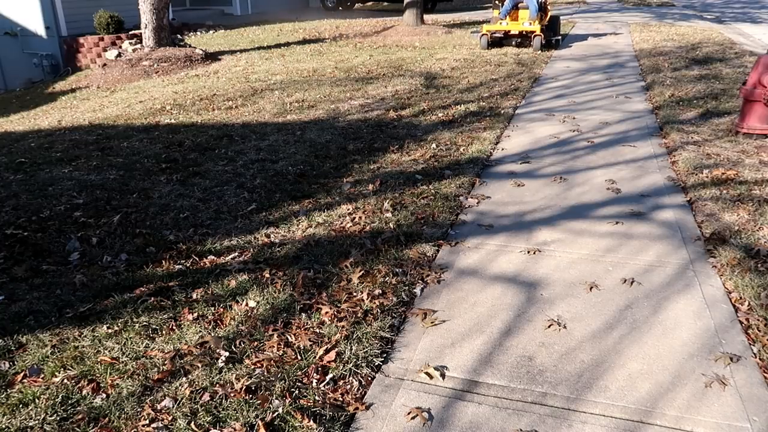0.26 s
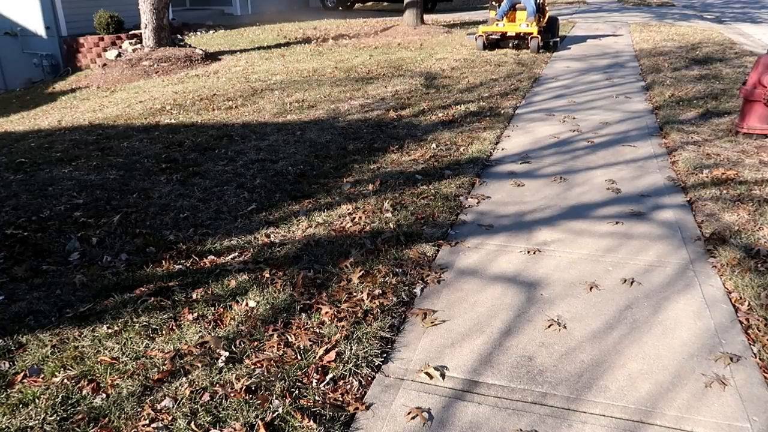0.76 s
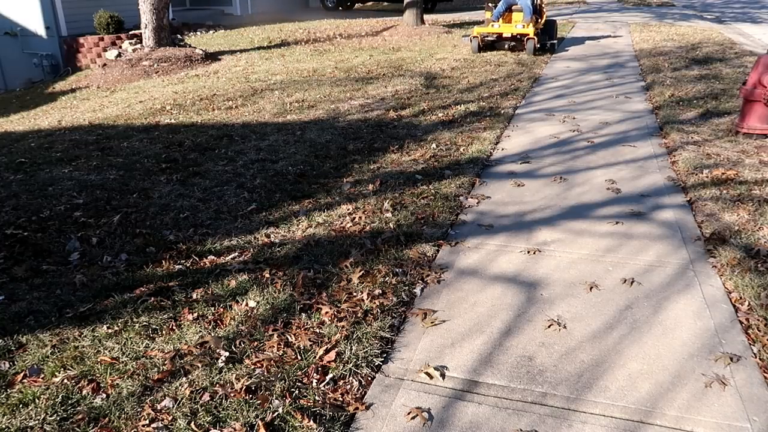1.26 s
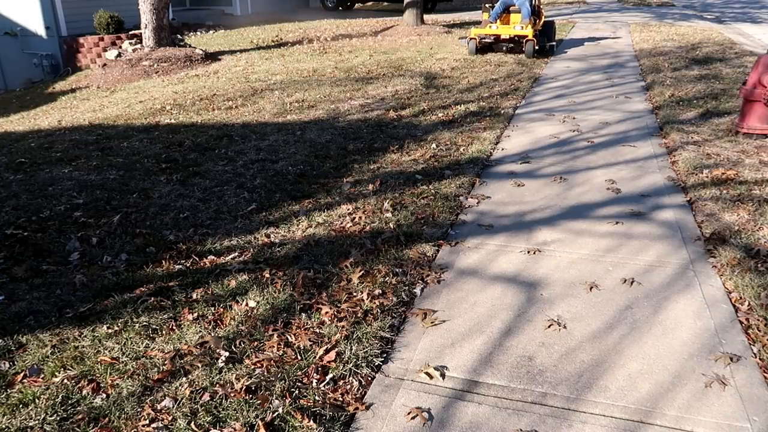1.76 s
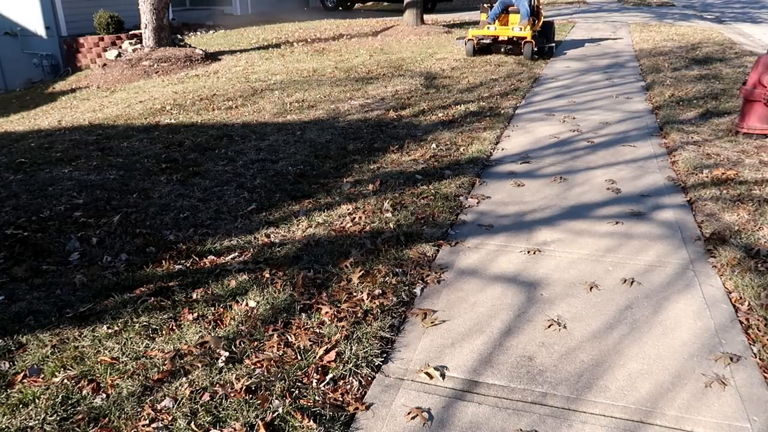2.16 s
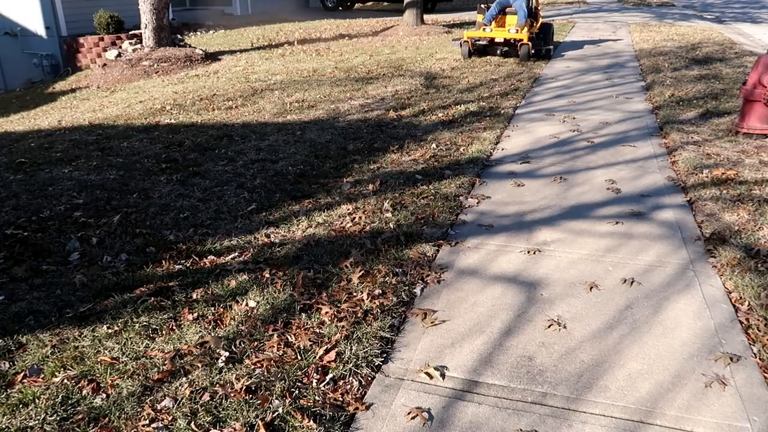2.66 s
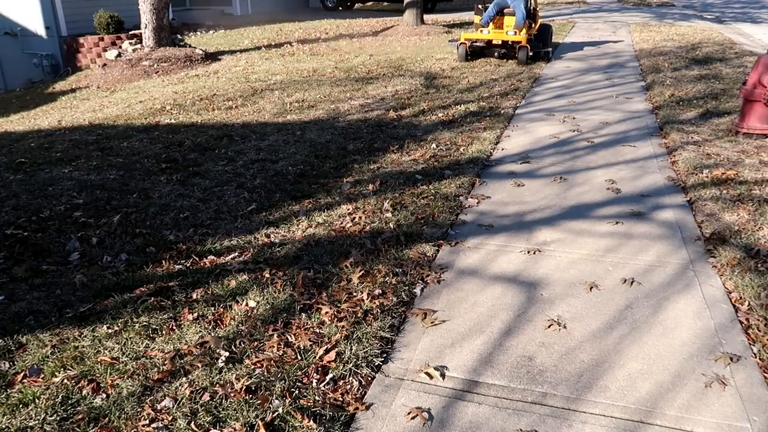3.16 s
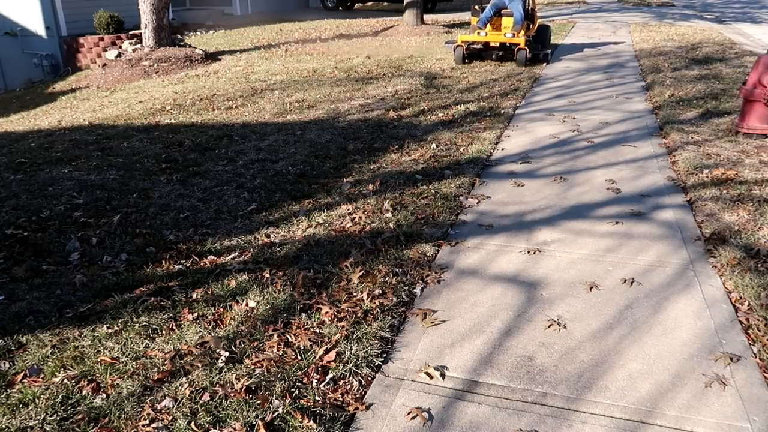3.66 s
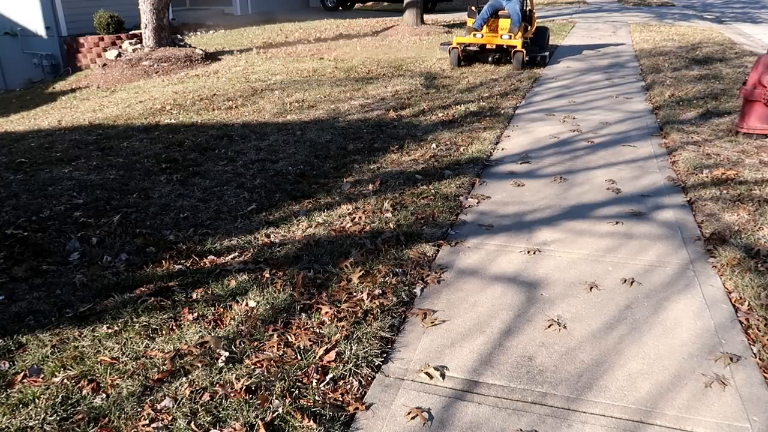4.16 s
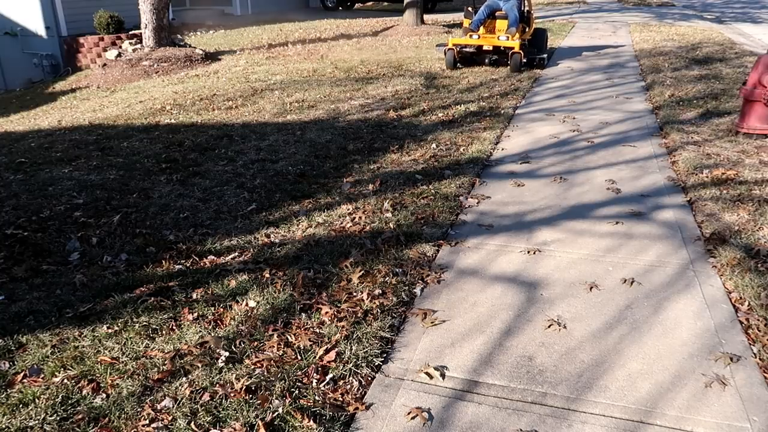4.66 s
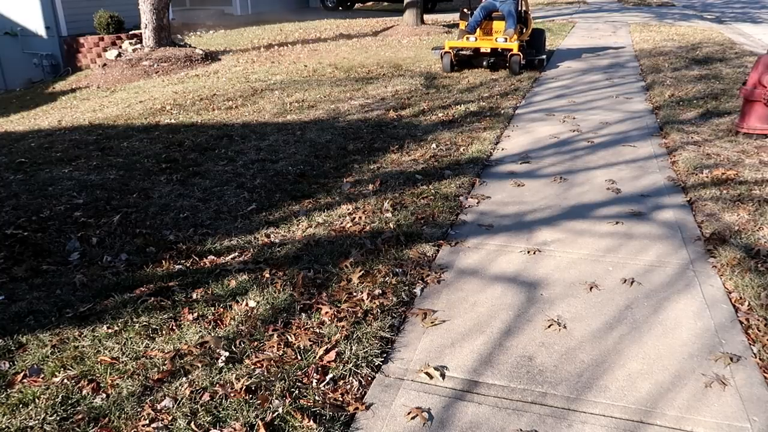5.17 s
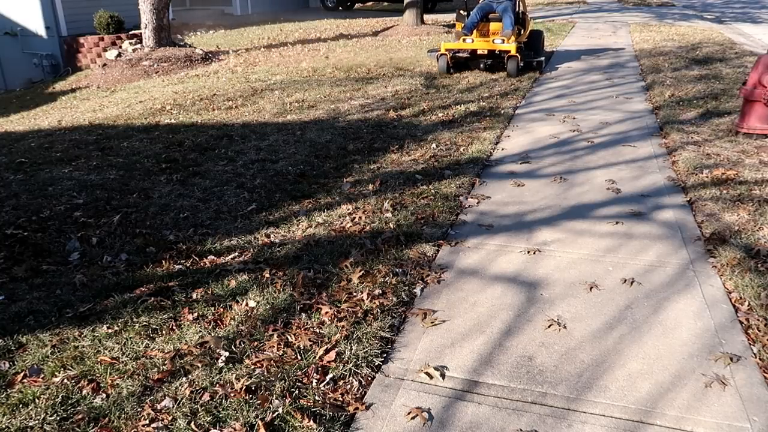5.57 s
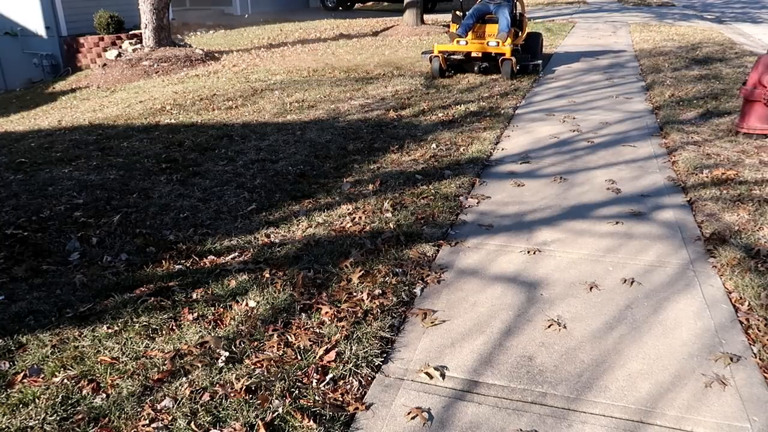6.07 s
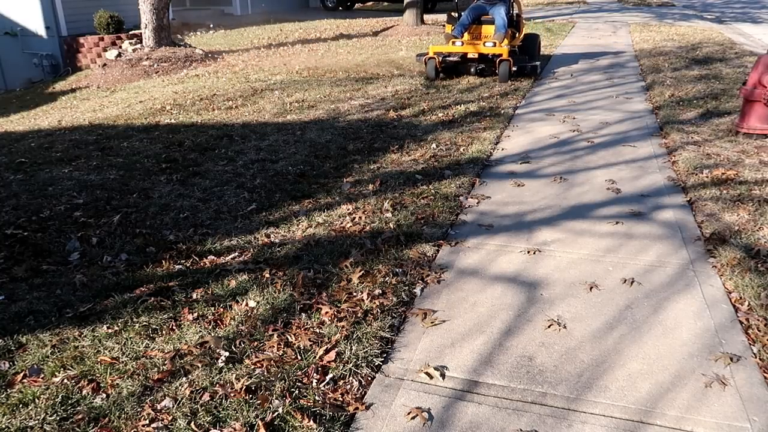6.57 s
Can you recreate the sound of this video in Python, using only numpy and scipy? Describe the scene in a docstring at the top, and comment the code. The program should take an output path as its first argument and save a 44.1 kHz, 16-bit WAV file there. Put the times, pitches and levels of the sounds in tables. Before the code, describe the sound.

Steady mowing from beginning to end: a heavy bass hum near 128 hertz, gritty engine overtones, broad low air noise and very faint thin whines. Load surges slightly near two and six seconds, without a real change of speed. Dry leaves tick and crackle through a quiet hiss; twigs crack irregularly, closely grouped near four seconds and the end. Outdoor stereo microphone, bass nearly central, treble wider, a touch rightward.

```python
"""A deep, uneven hum is heard first: the blades of a ride-on mower, drifting in and out of step.
It beats against the exhaust overtones of a twin-cylinder engine, over chopped, turbulent air and faint whines.
Cut grass hisses and dry leaves snap, as dense and sparse trains of short noise bursts.
Now and then a shredded twig cracks, rings and rattles; house fronts return a little of this debris sound."""
import sys
import numpy as np
from scipy import signal
from scipy.fft import rfft, irfft, next_fast_len
from scipy.io import wavfile
from scipy.ndimage import map_coordinates

SR = 44100
rng = np.random.default_rng(int(sys.argv[2]) if len(sys.argv) > 2 else 0)


def to_wav(sig):
    """Store sig (one row per channel, or 1-D mono) as 16-bit WAV at the path in sys.argv[1].

    Samples outside -1..1 are clipped; the rate is SR.
    """
    pcm = np.clip(np.atleast_2d(sig), -1, 1) * 32767
    pcm = np.round(pcm).astype(np.int16)
    wavfile.write(sys.argv[1], SR, pcm.T)  # frames by channels


N = 301193
T = np.arange(N) / SR  # time in s

# Governed speeds of blades and crankshaft. Columns: time_s, blade_pass_hz, crankshaft_hz
SPEED = [(0.0, 127.59, 53.41), (0.4, 128.95, 53.44), (0.8, 128.03, 53.45), (1.21, 129.23, 53.63),
         (1.61, 127.49, 53.39), (2.01, 128.42, 53.64), (2.41, 128.13, 53.28), (2.81, 128.9, 53.75),
         (3.21, 128.6, 53.35), (3.62, 128.26, 53.41), (4.02, 128.55, 53.42), (4.42, 128.43, 53.46),
         (4.82, 128.16, 53.25), (5.22, 128.3, 53.42), (5.62, 127.29, 53.09), (6.03, 127.67, 53.45),
         (6.43, 128.68, 53.67), (6.83, 128.83, 54.06)]
# Load on the mower as the grass thickens and thins. Columns: time_s, above_normal_db
LOAD = [(0.0, -1.5), (.35, -2.5), (.85, -0.5), (1.35, 2), (1.6, 2.5), (1.82, 4), (2.0, 0.9), (2.8, -0.5),
        (3.2, -1.4), (3.6, -1), (3.8, 1), (4.3, -0.7), (4.9, -3), (5.35, -0.3), (5.75, -0.8), (6.04, 3.5),
        (6.33, -0.5), (6.83, 0.4)]

# Hum of the blades when in step. Columns: multiple_of_blade_rate, level_db
BLADE_HUM = [(1, -13.5), (2, -18.5), (3, -20.5), (4, -33)]
# Slow beats between the blades.
# Columns: multiple_of_blade_rate, rate_difference_hz, first_fade_s, depth_db, narrowness (no unit)
BLADE_FADES = [(1, 0.24, 1.75, 7.5, 9), (1, 0.25, 0.99, 2.5, 4.5), (3, .232, 1.324, 13.5, 1.3),
               (3, 0.039, .1, 2.5, 2)]
# Uneven swell of the hum's octave. Columns: time_s, re_full_level_db
OCTAVE_SWELL = [(0.0, -0.5), (.35, -9.5), (.65, -9.5), (1.15, -1.5), (1.5, -2), (1.67, -6.5), (1.85, 0.3),
                (2.35, -2), (2.6, -6.5), (3.05, -8.5), (3.35, -3), (3.6, -4.5), (3.85, -23), (4.1, -3),
                (4.55, -0.5), (5.05, -10), (5.5, -1), (5.95, -0.5), (6.48, -9), (6.7, -3)]
# Upper blade overtones at normal load. Columns: multiple_of_blade_rate, level_db
BLADE_BUZZ = [(5, -42), (6, -37.5), (7, -41), (8, -47), (9, -49.5), (10, -45.5)]

# Exhaust overtones before their swells. Columns: multiple_of_four_stroke_cycle, level_db
EXHAUST = [(1, -55), (2, -37.5), (3, -50), (4, -46), (5, -30), (6, -39), (7, -47), (8, -36.5), (10, -43),
           (11, -57), (12, -44), (13, -42), (14, -41.5), (15, -48), (18, -48), (19, -47.5), (20, -43),
           (21, -51), (23, -45.5), (24, -40.5)]
# Throb of the exhaust as the engine labours. Columns: time_s, swell_db
THROB = [(0.0, 1), (.85, -2), (1.75, 7), (2.0, -1.5), (2.8, 4), (3.1, -2), (4.0, 0), (5.2, -2), (6.3, 3),
         (6.83, -3)]

# Spectrum shape of the air in the deck. Columns: frequency_hz, relative_density_db_per_hz
AIR_SPECTRUM = [(25, -30), (65, -17), (110, 0), (190, -0.5), (320, 0.5), (470, -1), (600, -2.5), (720, -6),
                (950, -9), (1300, -15), (1700, -21), (3000, -27.5), (6000, -57.5)]
# Thin whines of the drive. Columns: frequency_hz, mean_level_db
WHINES = [(3490, -62.5), (5804, -71)]

# Spectrum shape of cut grass and leaves. Columns: frequency_hz, relative_density_db_per_hz
CUT_SPECTRUM = [(600, -17), (1500, 1.5), (2300, 0), (3300, 0), (4800, -4), (6200, -4.5), (8500, -7),
                (10000, -13), (12500, -22.5), (15000, -42)]
# How much grass and leaf is being cut, before a common offset. Columns: time_s, relative_level_db
FEED = [(0.0, -37), (0.19, -38.5), (1.12, -37), (1.52, -33), (1.69, -34), (2.04, -36.5), (2.79, -36.5),
        (3.25, -39), (4.15, -36), (4.7, -39), (5.71, -38), (6.01, -35.5), (6.43, -36), (6.83, -38)]
# Spectrum shape of a brittle leaf snapping. Columns: frequency_hz, relative_density_db_per_hz
SNAP_SPECTRUM = [(1500, -10), (4000, -2), (7500, 0), (10000, -5), (12500, -14), (15000, -24)]

# Twigs and hard leaves. Columns: start_s, crack_db, pitch_hz, ring_re_crack_db
TWIGS = [(0.625, -29, 5000, -12), (1.019, -33, 4000, -7), (1.262, -41, 4600, 10), (1.38, -29, 4300, -4),
         (1.543, -22.5, 1880, -7), (1.823, -29.5, 9500, -8), (2.016, -29, 1950, -3), (2.331, -32, 3500, -5),
         (2.424, -27, 4220, -11), (3.04, -37, 7000, 3), (3.092, -33, 3400, -14), (3.474, -26, 2100, -10),
         (4.017, -25.5, 2930, -7), (4.022, -39, 6760, 6), (4.08, -30, 4440, -17), (4.186, -31, 3100, -7),
         (4.315, -28, 4500, -19), (4.657, -48, 6650, 14), (5.011, -32, 3160, -15), (5.826, -29.5, 3900, -7),
         (6.458, -28, 6570, -14), (6.703, -24, 3520, -2), (6.703, -24, 5300, -1), (6.718, -32, 3500, -19),
         (6.742, -27, 5850, -8), (6.758, -33, 2980, -11)]
# Spectrum shape of a twig against blade and deck. Columns: frequency_hz, relative_density_db_per_hz
CRACK_SPECTRUM = [(400, -14), (1200, 4), (2200, -2), (3400, 0), (5500, -1), (8500, -5.5), (11000, -17),
                  (15000, -32)]

# Difference between the two channels of a spread sound. Columns: frequency_hz, side_re_mid_db
WIDTH = [(60, -22), (250, -27), (500, -24.5), (1000, -18), (2000, -15.5), (4000, -8), (8000, -15),
         (10000, -13), (12500, 1)]
# Balance of the two channels. Columns: frequency_hz, left_minus_right_db
BALANCE = [(120, -.1), (250, -.6), (500, -1.4), (1200, -2), (2200, -1.1), (4000, -1), (8000, -.3)]


def undb(db):
    """A level in decibels is twenty times the logarithm of the amplitude ratio returned."""
    return 10 ** (np.asarray(db) / 20)


def unit(x):
    """Division by the root mean square gives a signal unit effective amplitude."""
    return x / np.sqrt(np.mean(x ** 2))


def curves(table):
    """Linear interpolation turns each column of a timed table into a continuous course."""
    time_s, *columns = np.transpose(table)
    return [np.interp(T, time_s, column) for column in columns]


def colour(x, points, size=2048):
    """A linear filter multiplies the spectrum by a gain, here joined in dB along log frequency."""
    hz, db = np.transpose(points)
    length = next_fast_len(N + 2 * size)
    margins = [(0, 0)] * (x.ndim - 1) + [(size, length - N - size)]
    padded = np.pad(x, margins, mode="reflect")
    log_hz = np.log(np.fft.rfftfreq(length, 1 / SR) + 1)
    gain = undb(np.interp(log_hz, np.log(hz), db))
    filtered = irfft(rfft(padded) * gain, length)
    return filtered[..., size:size + N]


def walk(rate):
    """Smooth random motion of rms 1: a cubic curve through rate random values a second."""
    knots = rng.standard_normal(4096)
    coarse = T[::32]
    motion = map_coordinates(knots, [coarse * rate], order=3, mode="wrap")
    return unit(np.interp(T, coarse, motion))


def spread(pair):
    """Mid and side sum and subtract to two channels: bass alike, treble scattered."""
    mid, side = pair[0], colour(pair[1], WIDTH)
    return mid + np.array([[1], [-1]]) * side


def fade_db(multiple):
    """Beating: blades of slightly unequal speed cancel, overtone k doing so k times as often."""
    db = np.zeros(N)
    for k, slip_hz, first_s, depth_db, narrowness in BLADE_FADES:
        if round(k) == multiple:
            beat = np.cos(np.pi * multiple * slip_hz * (T - first_s))
            db -= depth_db * np.abs(beat) ** (2 * narrowness)
    return db


def blades(angle, load_db):
    """Periodic tip pressure gives harmonics: the hum swells unevenly, the buzz grows with load."""
    waver_db, hum_db_per_load_db, buzz_db_per_load_db = 1.5, 2, 0.95
    flutter_rad, slip_rad, spindles = 0.09, 0.3, 3
    angle = angle + flutter_rad * walk(30)
    swells_db = [
        fade_db(1),
        curves(OCTAVE_SWELL)[0],
        fade_db(3) + waver_db * walk(6),
        hum_db_per_load_db * load_db + waver_db * walk(6),
    ]
    hum = 0
    for (k, db), swell_db in zip(BLADE_HUM, swells_db):
        # the minus sign makes each pass lopsided: a slow rise and a steep drop
        hum = hum - undb(db + swell_db) * np.sin(round(k) * angle)
    buzz = 0
    for _ in range(spindles):
        spindle_angle = angle + slip_rad * walk(5)
        for k, db in BLADE_BUZZ:
            phase = 2 * np.pi * rng.random()
            buzz = buzz + undb(db) * np.cos(round(k) * spindle_angle + phase)
    buzz = buzz / np.sqrt(spindles) * undb(buzz_db_per_load_db * load_db)
    return np.sqrt(2) * (hum + buzz)


def engine(angle, throb_db):
    """Cyclic firing gives harmonics: the lowest throb, the fifth beats with the blades, others waver."""
    uneven_db, muffler_lag = 2.0, 0.052  # lag in turns of phase, times the overtone number squared
    exhaust = 0
    for k, db in EXHAUST:
        k = round(k)
        if k < 5:
            swell_db = throb_db
        elif k > 5:
            swell_db = uneven_db * walk(9)
        else:
            swell_db = 0
        # the muffler holds higher overtones back longer, which smears each pulse
        phase = k * angle - 2 * np.pi * muffler_lag * k ** 2
        exhaust = exhaust - undb(db + swell_db) * np.sin(phase)
    return np.sqrt(2) * exhaust


def deck_air(angle, load_db):
    """Turbulence is broadband noise, here chopped by each blade and gusting as grass chokes the flow."""
    normal_db, gust_db, chop = -23, 1.0, 0.022
    puffs = rng.standard_normal((2, N)) * (1 + chop * np.cos(angle))
    air = spread(unit(colour(puffs, AIR_SPECTRUM)))
    return air * undb(normal_db + load_db + gust_db * walk(14))


def drive():
    """Belts and pumps whine faintly: nearly pure tones, wavering in frequency and amplitude."""
    waver, flicker_db = 0.00102, 3  # waver as a fraction of the frequency
    whine = 0
    for hz, db in WHINES:
        level = np.sqrt(2) * undb(db + flicker_db * walk(11))
        angle = 2 * np.pi * np.cumsum(hz * (1 + waver * walk(25))) / SR
        whine = whine + level * np.sin(angle)
    return whine


def snap_train(snaps_per_s, size_db, size_limit, decay_s):
    """Shot noise: random impulses of unequal size, each decaying exponentially, shape noise bursts."""
    sizes = undb(size_db * rng.exponential(size=N).clip(0, size_limit))
    impulses = (rng.random(N) < snaps_per_s / SR) * sizes
    envelope = signal.lfilter([1], [1, -np.exp(-1 / (decay_s * SR))], impulses)
    return envelope * rng.standard_normal((2, N))


def cutting(angle, cut_db):
    """Countless cut stalks merge into noise; leaf snaps crackle through it, all stronger at each blade pass."""
    hiss_db, crackle_db = 6.5, -6  # only their balance matters
    chop, tuft_db = 0.021, 1.0
    hiss = rng.standard_normal((2, N))
    crackle = unit(snap_train(snaps_per_s=700, size_db=5.5, size_limit=6, decay_s=0.00031))
    mixture = undb(hiss_db) * hiss + undb(crackle_db) * crackle
    feed = (1 + chop * np.cos(angle)) * undb(cut_db + tuft_db * walk(45))
    return spread(unit(colour(mixture, CUT_SPECTRUM))) * feed


def leaves(cut_db):
    """Brittle fracture is brief, hence bright: single leaves snap along with the hiss."""
    re_cut_db = -18
    snaps = snap_train(snaps_per_s=40, size_db=3, size_limit=3, decay_s=0.00039)
    return spread(unit(colour(snaps, SNAP_SPECTRUM))) * undb(cut_db + re_cut_db)


def house_fronts(x):
    """Scattered reflection: convolution with decaying noise, different at each ear."""
    wet_db, t60_s, first_echo_s = -17, 0.23, 0.012
    age = T[:SR // 2]
    decay = np.exp(-np.log(1000) * age / t60_s)
    tail = rng.standard_normal((2, len(age))) * decay * (age > first_echo_s)
    tail = tail / np.sqrt(np.sum(tail ** 2, axis=1, keepdims=True))
    return x + undb(wet_db) * signal.fftconvolve(x, tail, axes=1)[:, :N]


def twigs():
    """Fracture excites a damped resonance: each twig cracks and rings, and splinters rattle in the deck."""
    middling_decay_s, middling_hz, size_law = 0.013, 4000, 0.68  # lower, bigger pieces last longer
    rise_s, splinter_db, rattle_db, rattle_s = 0.0008, 3.5, -13, 0.036
    sharpness, ring_top_hz = 11, 9000  # sharpness is the Q of the resonance
    out = np.zeros((2, N))
    roughness = undb(splinter_db * walk(450).clip(-2, 1.5))
    splinters = unit(rng.standard_normal((2, N)) * roughness)
    crack = unit(colour(splinters, CRACK_SPECTRUM))
    low_pass = signal.butter(2, ring_top_hz, fs=SR, output="sos")
    push = signal.sosfilt(low_pass, splinters)
    for start_s, db, hz, ring_db in TWIGS:
        decay_s = middling_decay_s * (middling_hz / hz) ** size_law
        start = int(start_s * SR)
        age = T[:min(N - start, SR // 4)]
        span = slice(start, start + len(age))
        resonance = signal.iirpeak(hz, sharpness, fs=SR)
        ring = unit(signal.lfilter(*resonance, push[:, span]))
        blow = np.exp(-age / decay_s)
        rattle = np.hypot(blow, undb(rattle_db) * np.exp(-age / rattle_s))
        onset = 1 - np.exp(-age / rise_s)
        piece = rattle * crack[:, span] + undb(ring_db) * blow * ring
        out[:, span] += undb(db) * onset * piece
    return spread(out)


def to_the_right(pair):
    """Level and time differences place a source: the left side is a little weaker and later."""
    left_lag_samples = 0.29
    left = colour(pair[0], [(hz, db / 2) for hz, db in BALANCE])
    right = colour(pair[1], [(hz, -db / 2) for hz, db in BALANCE])
    late_left = map_coordinates(left, [np.arange(N) - left_lag_samples], order=3, mode="nearest")
    return np.array([late_left, right])


def scene():
    """Superposition: machine and debris add, a little to the right; only the debris is echoed."""
    feed_offset_db, throb_waver_db = 0.22, 2
    blade_hz, crank_hz = curves(SPEED)
    load_db = curves(LOAD)[0]
    cut_db = feed_offset_db + curves(FEED)[0]
    throb_db = curves(THROB)[0] + throb_waver_db * walk(5)  # the throb also comes and goes by itself
    blade_angle = 2 * np.pi * np.cumsum(blade_hz) / SR
    cycle_angle = np.pi * np.cumsum(crank_hz) / SR  # one four-stroke cycle takes two turns
    machine = blades(blade_angle, load_db) + engine(cycle_angle, throb_db)
    machine = machine + deck_air(blade_angle, load_db) + drive()
    debris = cutting(blade_angle, cut_db) + leaves(cut_db) + twigs()
    return to_the_right(machine + house_fronts(debris))


def record(dry):
    """A steep elliptic low-pass removes the extreme treble."""
    top_hz, ripple_db, rejection_db = 14800, 0.1, 80
    low_pass = signal.ellip(8, ripple_db, rejection_db, top_hz, fs=SR, output="sos")
    return signal.sosfilt(low_pass, dry)


dry = scene()
out = record(dry)
to_wav(out)
```